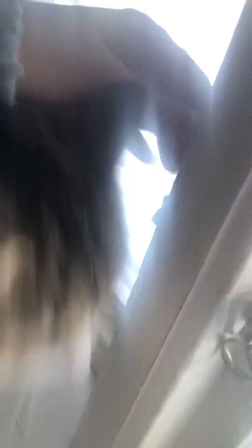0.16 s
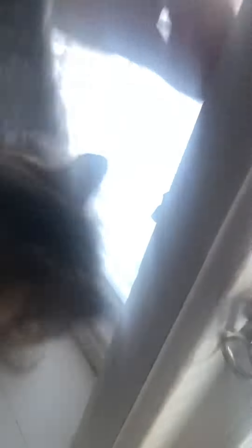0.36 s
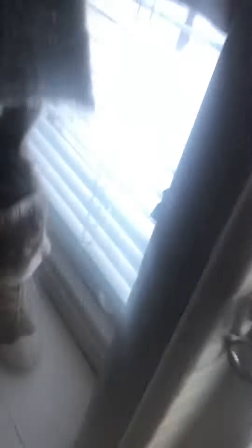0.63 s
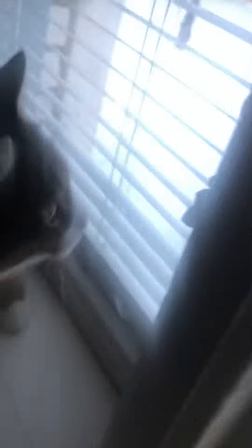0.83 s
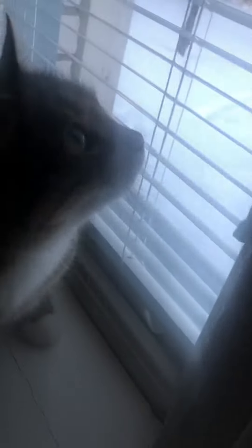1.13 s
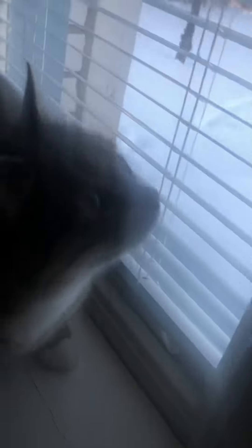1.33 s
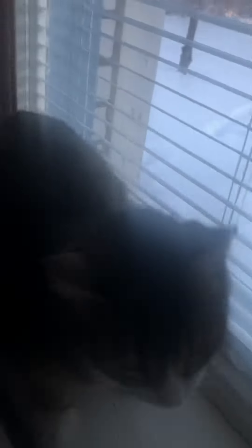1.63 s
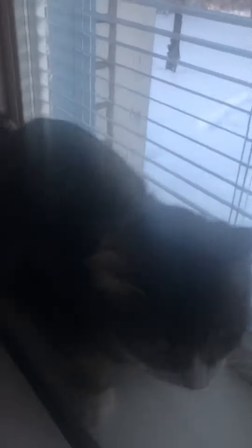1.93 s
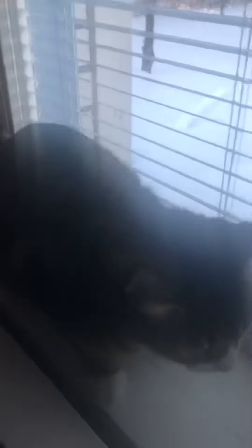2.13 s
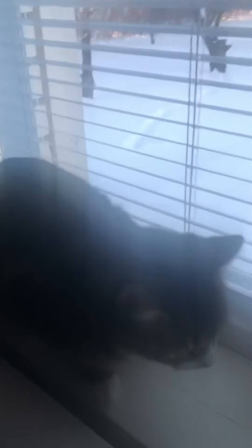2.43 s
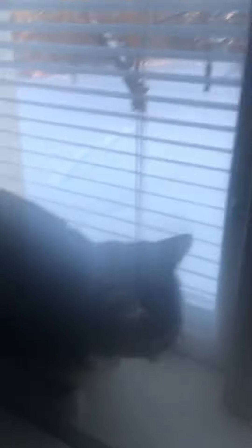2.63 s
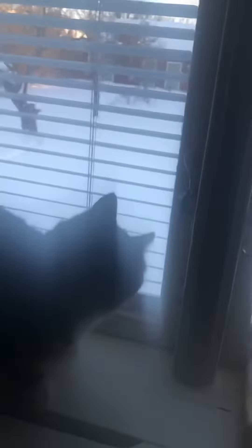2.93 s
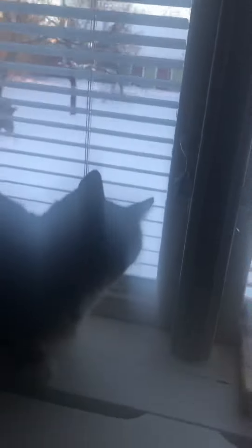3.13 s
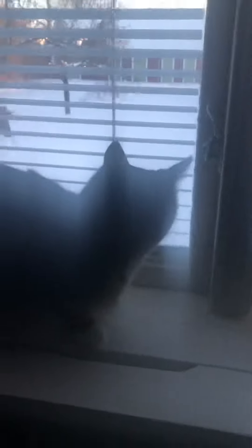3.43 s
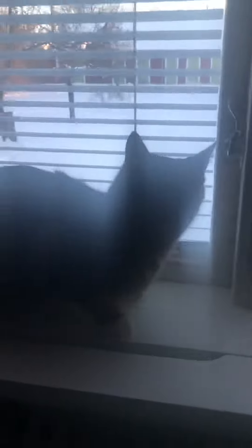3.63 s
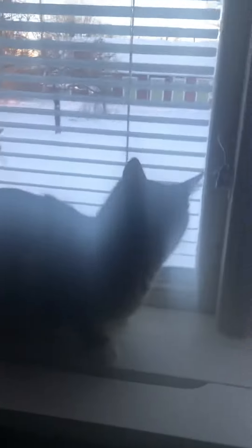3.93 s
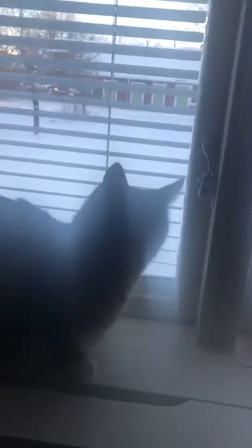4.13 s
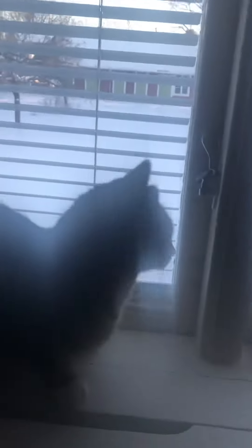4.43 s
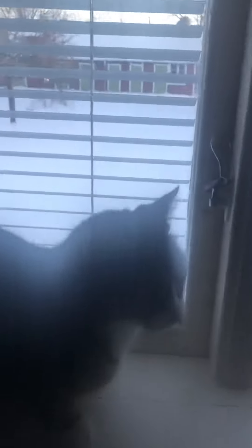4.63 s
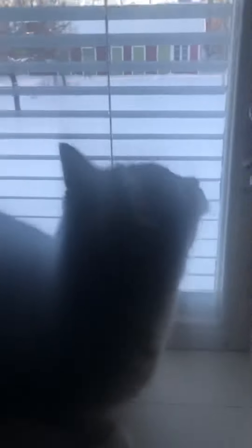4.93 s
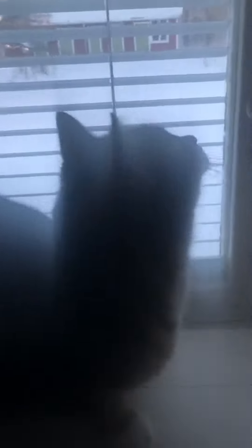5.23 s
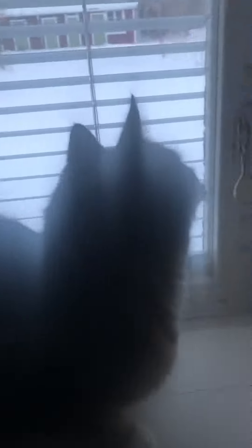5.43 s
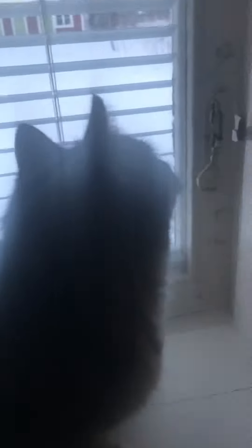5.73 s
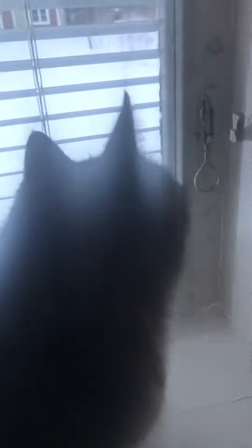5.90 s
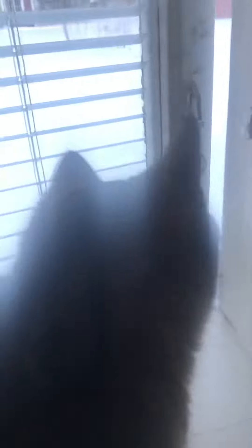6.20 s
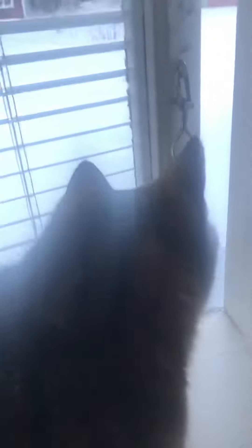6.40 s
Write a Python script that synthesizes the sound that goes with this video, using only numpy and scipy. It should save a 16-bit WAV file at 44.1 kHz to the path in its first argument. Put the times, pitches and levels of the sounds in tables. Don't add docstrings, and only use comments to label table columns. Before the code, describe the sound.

Close in a quiet room, hard latch clacks, soft paw thuds and light blind ticks lead to a sudden burst of metallic rattling and snapping.

```python
import sys
import numpy as np
from scipy import signal
from scipy.fft import rfft, irfft
from scipy.io import wavfile
from scipy.ndimage import uniform_filter1d

SR = 44100
rng = np.random.default_rng(int(sys.argv[2]) if len(sys.argv) > 2 else 0)


def to_wav(sig):
    pcm = np.clip(np.atleast_2d(sig), -1, 1) * 32767
    pcm = np.round(pcm).astype(np.int16)
    wavfile.write(sys.argv[1], SR, pcm.T)


def gain_from_db(level_db):
    decades = np.asarray(level_db, float) / 20
    return 10 ** decades


N = 289296

# frequency in Hz, level in dB per Hz.
FRAME_COLOUR = [(150, -14), (300, 1), (700, -3), (1500, -12.5), (2500, -27)]
# frequency in Hz, level in dB per Hz.
SLAT_COLOUR = [(900, -7.5), (1500, 1), (2500, 3.5), (4000, 2), (6000, -8.5), (8000, -28.5)]
# frequency in Hz, level in dB per Hz.
FINE_COLOUR = [(4500, -11.5), (6000, -1.5), (8000, -0.5), (11000, -5), (15700, -4), (16300, -32)]
# frequency in Hz, level in dB per Hz.
OPEN_TREBLE = [(4500, -10.5), (6000, 0), (8500, 1), (11000, -5), (13500, -3), (14800, -10), (16000, -12.5),
               (16800, -29)]
LATCH_HZ = [6490, 9130, 10490, 15093, 7680, 3875, 12350, 5480]


def evened(x):
    return x / np.sqrt(np.mean(x ** 2) + 1e-20)


def add(mix, s, sound):
    part = mix[round(s * SR):][:len(sound)]
    part += sound[:len(part)]


def coloured(x, spectrum):
    f, db = np.transpose(spectrum)
    hz = np.fft.rfftfreq(x.shape[-1], 1 / SR)
    gain = gain_from_db(np.interp(np.log(hz + 1), np.log(f + 1), db, left=-80, right=-80))
    return evened(irfft(rfft(x) * gain, x.shape[-1]))


def around(x, hz, octaves):
    distance = np.log2((np.fft.rfftfreq(len(x), 1 / SR) + 1) / hz) / octaves
    return evened(irfft(rfft(x) / (1 + distance ** 2), len(x)))


def swell(t, rise, t60):
    shape = (1 - np.exp(-np.maximum(t, 0) / rise)) * gain_from_db(-60 * t / max(t60, .004))
    return shape / shape.max()


def smoothed(x, size, axis=-1):
    return uniform_filter1d(uniform_filter1d(x, size, axis=axis), size, axis=axis)


def lumps(size, depth_db):
    return evened(gain_from_db(depth_db * evened(smoothed(rng.standard_normal(N), size))))


def mottled(noise, width_hz, depth_db):
    bins = noise.shape[-1] // 2 + 1
    size = max(int(width_hz * noise.shape[-1] / SR), 1)
    bumps = smoothed(rng.standard_normal((len(noise), bins)), size)
    return irfft(rfft(noise) * gain_from_db(depth_db * evened(bumps)), noise.shape[-1])


def patchy(x, depth_db):
    z = signal.stft(x, nperseg=512)[2]
    patches = uniform_filter1d(rng.standard_normal(z.shape), size=5, axis=0)
    patches = uniform_filter1d(patches, size=16, axis=1)
    return evened(signal.istft(z * gain_from_db(depth_db * evened(patches)), nperseg=512)[1][:N])


def still_air():
    # frequency in Hz, level in dB per Hz.
    air_colour = [(15, -41), (25, -17.5), (59, 4.5), (166, 0.5), (236, -15.5), (439, -19.5), (624, -12.5),
                  (1940, -17.5), (11000, -27), (14800, -26), (15900, -28.5)]
    return gain_from_db(-68 - 1.5) * coloured(rng.standard_normal(N), air_colour)


def strokes(offset_db, lean):
    # middle in seconds, length in seconds, level in dB, brightness in dB.
    handling = [(0.047, .1, -76.5, -5), (0.142, 0.12, -66.5, 10.5), (0.199, .1, -66, -41),
                (0.251, 0.07, -69, 14), (0.326, .11, -57.5, -5.5), (.385, .07, -58, 5.5),
                (0.487, 0.19, -50, -4), (0.602, 0.11, -66.5, 11), (0.727, 0.25, -66.5, 8.5),
                (4.856, .1, -64, -5), (5.04, 0.084, -55.5, -6), (5.122, .15, -50, 1),
                (5.238, 0.16, -46.5, -7), (5.353, .09, -51, 3.5), (5.413, 0.091, -48.5, 7),
                (5.483, .13, -46, -13), (5.69, 0.49, -59, -5), (5.799, .22, -72.5, 8),
                (5.989, .38, -68.5, 5)]
    # middle in seconds, length in seconds, level in dB,
    # brightness in dB.
    brushes = [(.84, 0.074, -72.5, -16), (.885, .15, -72, 0), (1.982, .12, -71.5, 8.5),
               (2.219, .36, -72, -2.5), (2.55, 0.16, -72.5, -33), (2.738, .2, -66, 0), (2.9, .16, -77, -32),
               (3.161, .2, -69.5, 7), (3.58, .15, -81, 1), (3.75, .1, -75.5, 8), (3.88, .1, -69.5, 2),
               (4.0, 0.49, -79.5, -17), (4.2, .12, -73, -9), (4.74, .22, -84, 10.5), (6.4, .25, -82, -39)]
    out = np.zeros(N)
    for s, length, db, bright_db in handling + brushes:
        arch = np.sin(np.pi * np.arange(0, length, 1 / SR) / length) ** 1.1
        add(out, max(s - length / 2, 0), gain_from_db(db + offset_db + lean * bright_db) * arch)
    return out


def stir():
    # time in seconds, level in dB.
    weight = [(0, -61), (.3, -53.5), (.52, -53.5), (.8, -63.5), (1.5, -72.5), (2.1, -67.5), (2.7, -67.5),
              (3.2, -64.5), (3.7, -65), (4.3, -74), (4.74, -70), (4.86, -56), (5.3, -47.5), (5.47, -44),
              (5.63, -53.5), (5.71, -43), (5.95, -52), (6.56, -69.5)]
    # frequency in Hz, level in dB per Hz.
    rumble_colour = [(15, -50), (25, -20.5), (42, -10), (97, -4.5), (156, 4.5), (379, -12), (425, -6.5),
                     (500, -24), (650, -55), (1100, -120)]
    rest_db = [-74, -88, -86.5]
    contacts_per_s, spread_db, busy_db = 500, 2.5, -62

    rumble = gain_from_db(np.interp(np.arange(N) / SR, *np.transpose(weight)) - 2.0)
    frame = gain_from_db(rest_db[0] - 4.5) + gain_from_db(-17) * rumble + strokes(offset_db=-4.5, lean=-0.3)
    rub = gain_from_db(rest_db[1]) + strokes(offset_db=-4.0, lean=0)
    fine = gain_from_db(rest_db[2]) + strokes(offset_db=-12.0, lean=0.89)

    strength = gain_from_db(spread_db * np.minimum(rng.exponential(1, N), 4))
    contacts = (rng.random(N) < contacts_per_s / SR) * strength
    smear = rng.standard_normal(300) * gain_from_db(-60 * np.arange(300) / SR / 0.0095)
    clicks = evened(signal.oaconvolve(contacts, smear)[:N])
    share = 0.39 * rub / (rub + gain_from_db(busy_db))
    grains = share * clicks + (1 - share) * rng.standard_normal(N)
    grains = patchy(grains * lumps(size=300, depth_db=1.5), depth_db=2.0)

    low = rng.standard_normal(N) * lumps(size=500, depth_db=2.0)
    deep = rumble * coloured(low, rumble_colour) + frame * coloured(low, FRAME_COLOUR)
    return deep + rub * coloured(grains, SLAT_COLOUR) + fine * coloured(grains, FINE_COLOUR)


def scrapes():
    # start in seconds, end in seconds, resonance in Hz, width in octaves, level in dB.
    drags = [(5.22, 5.31, 560, .6, -50.5), (5.21, 5.27, 1000, 0.18, -44.5), (5.08, 5.18, 1700, .08, -58),
             (5.665, 5.73, 900, 0.3, -55.5), (.455, .49, 3600, .08, -48), (.17, 0.206, 2900, 0.33, -66),
             (5.5, 5.62, 420, 0.58, -56), (5.668, 5.77, 590, 0.42, -60), (.815, .865, 740, .4, -66),
             (6.35, 6.46, 690, .5, -70.5), (.675, .725, 6000, 0.03, -75), (.67, .74, 3200, 0.03, -76),
             (.67, 0.83, 5200, .8, -66.5), (.79, .825, 7350, .03, -74), (.29, .33, 5500, .04, -63),
             (0, .14, 1750, 0.16, -71), (0.272, 0.48, 3900, .05, -67), (0.419, 0.515, 3950, .06, -54),
             (.5, .555, 3000, .8, -64.5), (.415, .48, 13500, .2, -64), (2.495, 2.6, 1330, 0.1, -71),
             (2.66, 2.948, 1370, 0.071, -83), (2.2, 2.82, 2000, 0.96, -77), (5.7, 5.96, 220, 0.3, -54),
             (5.32, 5.43, 500, .6, -55.5), (.235, .27, 14000, .15, -71), (5.44, 5.5, 6900, 0.66, -42),
             (2.84, 2.97, 530, 0.17, -67), (4.64, 4.9, 3900, 0.038, -83), (4.65, 4.84, 14700, .15, -78),
             (5.132, 5.18, 4080, 0.022, -47), (5.068, 5.13, 3900, 0.062, -52),
             (5.32, 5.4, 3950, .06, -59.5), (5.44, 5.52, 3950, .08, -52), (5.75, 5.872, 2000, 0.2, -66.5),
             (5.7, 6.17, 4440, 0.069, -75), (5.9, 6.1, 13000, .15, -77)]
    out, noise = np.zeros(N), rng.standard_normal(N) * lumps(size=250, depth_db=1.5)
    for start, stop, hz, octaves, db in drags:
        part = around(noise[int(start * SR):int(stop * SR)], hz, octaves)
        add(out, start, gain_from_db(db) * part * signal.windows.tukey(len(part), .5))
    return out


def thuds():
    # start in seconds, level in dB, pitch in Hz, time to die by 60 dB in seconds.
    pushes = [(.01, -49, 60.7, 0.072), (.29, -57, 70, 0.11), (0.619, -51, 60, 0.13),
              (0.177, -43.5, 335, 0.081), (.295, -43, 297, 0.13), (3.08, -49, 65, .1),
              (3.15, -50.5, 65, 0.14), (3.22, -47.5, 60, 0.099), (3.312, -50.5, 59.6, 0.08),
              (5.23, -42.5, 70, 0.14), (5.901, -44, 60.4, 0.17), (6.37, -52.5, 301, .1),
              (0.42, -36.5, 232.6, 0.29), (.51, -43, 223, 0.32), (0.815, -48.5, 471, 0.13),
              (1.006, -48, 95, 0.11), (1.325, -53, 144.7, 0.05), (1.356, -46.5, 86, 0.13),
              (1.632, -51, 99, 0.11), (1.97, -54.5, 192, 0.04), (2.083, -49, 137, 0.049),
              (2.117, -51, 193, 0.048), (2.526, -44.5, 160, 0.035), (3.142, -39, 277, 0.032),
              (3.205, -32, 150, 0.021), (3.299, -43.5, 383, 0.065), (3.361, -54, 80, 0.087),
              (3.615, -54.5, 262, 0.061), (4.696, -53, 159, 0.057), (4.828, -45.5, 212, 0.11),
              (4.961, -49.5, 158.5, 0.069), (5.213, -30, 648.7, 0.053), (5.438, -31, 1044, 0.037),
              (5.446, -23.5, 320, 0.017), (5.667, -46, 355, 0.091), (6.211, -50.5, 267, 0.18),
              (6.288, -55, 256, 0.19), (6.521, -51.5, 208, 0.16)]
    out, t = np.zeros(N), np.arange(6000) / SR
    for s, db, hz, t60 in pushes:
        turn = 2 * np.pi * np.cumsum(hz * (.9 + 2.4 * np.exp(-t / 0.0026))) / SR
        wave = np.sin(turn) + 0.36 * np.sin(.42 * turn)
        add(out, s, gain_from_db(db - 2.5) * wave * swell(t, 0.0016, t60))
    return out


def hits(rows, treble, t60, tone, tail_db, snap):
    out, t = np.zeros(N), np.arange(6000) / SR
    noise = mottled(rng.standard_normal((len(rows), 6000)), width_hz=180, depth_db=2.5)
    middle, bright = coloured(noise, SLAT_COLOUR), coloured(noise, treble)
    dull = coloured(noise, FRAME_COLOUR)
    tail = gain_from_db(tail_db) * swell(t, 0.0014, 0.27)
    first = 1 + snap * np.exp(-t / 0.00036)
    for k, (s, db, bright_db, dull_db, hz) in enumerate(rows):
        note = np.sqrt(2) * np.sin(2 * np.pi * hz * t) * gain_from_db(-40 * t / t60)
        crack = around(middle[k], hz, 2.1)
        sound = ((1 - tone) * crack * first + tone * note) * swell(t, 0.00019, t60) + crack * tail
        bright_shape = swell(t, 0.00017, 0.76 * t60) + .5 * tail + first - 1
        sound += gain_from_db(bright_db) * bright[k] * bright_shape
        sound += gain_from_db(dull_db) * dull[k] * swell(t, 0.0014, 2.6 * t60)
        add(out, s, gain_from_db(db - 8) * sound)
    return out


def taps():
    # start in seconds, level in dB, treble in dB, frame in dB, resonance in Hz.
    contacts = [(.1655, -33.5, -22, -33, 2240), (.2907, -46, -8, -30, 7680), (.3122, -44, -14.5, -30, 3253),
                (.4112, -16.5, 0, -30, 12350), (.4648, -46, -10, -29, 12330), (.475, -29.5, -20, -32, 5000),
                (.4835, -33, -20, -30, 3200), (.5195, -31, -23, -30, 4970), (.6185, -48, -9, -20, 6000),
                (.8715, -54, -9, -21.5, 7300), (.9245, -57, -9, -17, 7310), (5.0217, -29.5, 0, -26, 6800),
                (5.0738, -23, -6, -29, 12350), (5.078, -21, -3, -30, 12350),
                (5.0975, -25.5, -3.5, -34, 12500), (5.1115, -39.5, -3, -30, 12350),
                (5.1255, -31, -2, -30, 7600), (5.1325, -31, -4, -30, 3880), (5.1598, -27, -8.5, -30, 7600),
                (5.189, -20, 2.5, -31, 12350), (5.195, -23, -2, -33, 7450), (5.2232, -29.5, -3, -30, 7500),
                (5.3158, -21.5, 1, -33, 12350), (5.3285, -38.5, -2.5, -22, 7590),
                (5.3555, -44, -3.5, -30, 7600), (5.4265, -27.5, 0, -30.5, 7600),
                (5.4356, -2.5, -12, -32.5, 5500), (5.4357, -9.5, -30.5, -31, 2400),
                (5.4398, -11.5, -8.5, -30, 12770), (5.4416, -17, -6, -28.5, 8500),
                (5.448, -24, 0, -30.5, 7590), (5.4528, -20, -6.5, -30, 13200),
                (5.4597, -22.5, -3.5, -30.5, 6000), (5.4718, -24.5, 0, -30.5, 7660),
                (5.4838, -27, -7.5, -31, 4000), (5.633, -52, -8, -30, 7800), (5.676, -40, -7, -30, 6530),
                (5.0186, -29, -20, -30, 3430)]
    return hits(contacts, OPEN_TREBLE, t60=0.012, tone=0.7, tail_db=-30.5, snap=0.4)


def clacks():
    # start in seconds, level in dB, treble in dB, frame in dB, slat resonance in Hz.
    blows = [(.1695, -35.5, -13, -35, 3300), (.171, -44, -28, 0.5, 3080), (.2674, -35.5, -14, -19.5, 3300),
             (.2755, -26, -26, -12.5, 3450), (.2897, -34, -27, -4, 2200), (.3046, -35, -30.5, -6, 3180),
             (.3174, -47, -10.5, -3, 3970), (.398, -31.5, -14, -14, 3390), (.411, -6.5, -18.5, -20.5, 3757),
             (.415, -12.5, -24, -18, 1774), (.4455, -12.5, -20, -20, 4050), (.4604, -24, -16, -19.5, 3920),
             (.4735, -23.5, -30.5, -23, 4060), (.5049, -34, -32, -28, 4170), (.519, -30, -34, -33, 3005),
             (5.6252, -39, -13.5, -8, 2947), (5.637, -41, -1, -30, 990), (5.665, -33.5, -27, 3.5, 1270),
             (5.6695, -42, -0.5, 6.5, 1010)]
    # frequency in Hz, level in dB per Hz.
    muffled_treble = [(4500, -11.5), (6000, -6.5), (8500, -4), (10000, -14), (12000, -22), (15500, -24),
                      (16800, -34)]
    return hits(blows, muffled_treble, t60=0.044, tone=0.5, tail_db=-26.5, snap=0.68)


def chatter(blows):
    note_db = [-7, -8, -3, -3, -8, -6, -6, -13]
    t = np.arange(6000) / SR
    notes = sum(gain_from_db(db) * np.sin(2 * np.pi * hz * t) for hz, db in zip(LATCH_HZ, note_db))
    return signal.oaconvolve(blows, gain_from_db(-37 - 60 * t / .09) * notes)[:N]


def latch():
    # struck in seconds, damped in seconds, level in dB,
    # time to die by 60 dB once damped in seconds.
    rings_of_notes = [
        [(.37, 0.47, -73, .03), (5.215, 5.23, -58, .05), (.411, 0.518, -39.5, .05),
         (5.073, 5.097, -41.5, 0.018), (5.1, 5.185, -59, .03), (5.317, 5.325, -43.5, 0.17),
         (5.672, 5.68, -67, .15)],
        [(.42, .441, -49, 0.032), (.445, .483, -48.5, 0.027), (.275, .29, -76, .1), (5.215, 5.25, -58, .06),
         (5.33, 5.391, -58, 0.029), (5.49, 5.62, -57.5, 0.65)],
        [(.278, .39, -75, .035), (.415, .418, -52, 0.04), (.44, .525, -67, .04), (5.08, 5.16, -47, 0.031),
         (5.16, 5.202, -39.5, 0.078), (5.331, 5.34, -54, 0.34), (5.429, 5.46, -40, 0.049),
         (5.495, 5.52, -49.5, 0.33)],
        [(.275, .39, -70, 0.058), (.402, .45, -55.5, .33), (5.078, 5.185, -45.5, 0.035),
         (5.192, 5.222, -32, 0.24), (5.32, 5.39, -50, 0.05), (5.4, 5.43, -56.5, .03), (5.44, 5.52, -49.5, .3),
         (5.57, 5.69, -61, .3)],
        [(.29, 0.3, -67, .03), (0.314, 0.322, -59, .02), (0.427, 0.4, -58, .03), (.447, 0.467, -52, 0.14),
         (5.37, 5.375, -51.5, .04), (5.1, 5.15, -62, .03), (5.215, 5.25, -63, .05), (5.46, 5.49, -44.5, 0.058),
         (5.16, 5.162, -34.5, 0.024)],
        [(.412, 0.455, -44, 0.15), (5.095, 5.135, -53, .03), (5.143, 5.15, -50, 0.033),
         (5.32, 5.38, -59.5, 0.045), (5.485, 5.51, -62, 0.11)],
        [(.399, .42, -64, .03), (.462, .48, -67.5, .06), (5.066, 5.07, -38, 0.03), (5.078, 5.082, -33, .04),
         (5.097, 5.1, -35, .04), (5.111, 5.114, -46, 0.045), (5.466, 5.475, -41, .027)],
        [(5.1, 5.135, -66, 0.036), (5.215, 5.25, -54, .05), (5.32, 5.36, -63.5, .08), (5.44, 5.45, -51, .06)],
    ]
    twin_gap_hz = [1.47, 13, 4.2, 9.5, 22, 170, 35, 30]
    out = np.zeros(N)
    for hz, gap_hz, rings in zip(LATCH_HZ, twin_gap_hz, rings_of_notes):
        for start, stop, db, t60 in rings:
            t = np.arange(int((stop - start + t60) * SR)) / SR
            level_db = db - 60 * np.maximum(t - (stop - start), 0) / t60
            pair = np.sin(2 * np.pi * hz * t) + 0.34 * np.sin(2 * np.pi * (hz + gap_hz) * t)
            add(out, start, np.sqrt(2) * gain_from_db(level_db) * (1 - np.exp(-t / 0.001)) * pair)
    return out


def ticks():
    # start in seconds, level in dB, treble in dB, frame in dB, slat resonance in Hz.
    touches = [(.8129, -50.5, -24, 8, 1605), (.9038, -55.5, -10, -11.5, 1010), (.9363, -48, -16, -5, 2300),
               (1.9663, -54, -12, -5, 1744), (1.9754, -50.5, -11.5, -8, 3940),
               (2.0002, -45.5, -10.5, -11, 5910), (2.5284, -64, -14, 16, 1277), (2.929, -64, 3, -2.5, 1170),
               (3.0699, -52.5, -20, -6, 1041), (3.0949, -47.5, -9, -12.5, 1290),
               (3.1375, -40.5, -12, -7.5, 2900), (3.1948, -38.5, -19, -11.5, 1810),
               (3.293, -42.5, -10, -12.5, 4360), (3.3004, -59, -30, 12, 1440),
               (3.4273, -51, -8, -2.5, 1370), (3.5703, -49.5, -10, -2.5, 1440), (3.58, -57, -14.5, 2, 1428),
               (3.7379, -59.5, -11, 5, 1422), (4.5471, -47, -6, -14, 3490),
               (4.96, -50.5, -9.5, -14.5, 2996)]
    return hits(touches, FINE_COLOUR, t60=0.017, tone=0.58, tail_db=-24.5, snap=1.4)


def rattle():
    # start in seconds, level in dB, treble in dB, frame in dB, slat resonance in Hz.
    knocks = [(5.0184, -30, -16, -34, 3540), (5.03, -32, 1.5, -19, 1930), (5.066, -22, -6, -33, 3120),
              (5.0713, -18, -5.5, -18.5, 2080), (5.0774, -24.5, -8.5, -23, 2470),
              (5.0884, -21, -14, -8.5, 2260), (5.0955, -32.5, 4.5, -24, 4000),
              (5.1122, -27, -11, -15.5, 3580), (5.1377, -23.5, -6.5, -29, 3730),
              (5.1587, -25, 1.5, -15, 4070), (5.1882, -14, -5, -22, 1120),
              (5.1976, -32.5, -10.5, 7.5, 1510), (5.2145, -16.5, -7.5, -9.5, 1130),
              (5.2247, -34, -3, 6, 1070), (5.2441, -35.5, 5.5, 5.5, 1030), (5.2689, -42, -5, 5, 1110)]
    return hits(knocks, OPEN_TREBLE, t60=0.055, tone=0.47, tail_db=-32.0, snap=0.75)


def squeak():
    # time in seconds, pitch in Hz, level in dB.
    glide = [
        (5.284, 4220, -53),
        (5.292, 4270, -49),
        (5.298, 4300, -46),
        (5.303, 4350, -55.5),
        (5.314, 4437, -55),
    ]
    harmonic_db = [6, -4, -4]
    s, hz, db = np.transpose(glide)
    t = np.arange(s[0], s[-1], 1 / SR)
    waver = 1 + .075 * evened(uniform_filter1d(rng.standard_normal(len(t)), size=24))
    turn = 2 * np.pi * np.cumsum(np.interp(t, s, hz) * waver) / SR
    stack = sum(gain_from_db(g) * np.sin((k + 1) * turn) for k, g in enumerate(harmonic_db))
    out = np.zeros(N)
    add(out, s[0], gain_from_db(np.interp(t, s, db)) * stack)
    return out


def snaps():
    # start in seconds, level in dB, treble in dB, frame in dB, slat resonance in Hz.
    bounces = [(5.3153, -17.5, 1.5, -8, 6040), (5.3335, -37, -5, 6, 1080), (5.3541, -41, -6, 0.5, 1089),
               (5.3692, -33, -2.5, -14, 7300), (5.3949, -26, -8, -26.5, 5470), (5.398, -18.5, 0, -16, 6300),
               (5.4234, -23.5, -7, -16.5, 5800), (5.4378, -12, -3.5, -15.5, 6210),
               (5.4395, -15.5, 5.5, -13, 1150), (5.4524, -16.5, 0, -15.5, 5600),
               (5.4654, -21.5, -1.5, -6.5, 3860), (5.4733, -19.5, -4, -12.5, 4200),
               (5.4814, -23, 4.5, -7.5, 6100), (5.4944, -33, 0.5, -3, 3880)]
    return hits(bounces, OPEN_TREBLE, t60=0.036, tone=0.59, tail_db=-30.0, snap=0.84)


def scene():
    metal = taps() + clacks() + rattle() + snaps()
    latch_sound = metal + chatter(metal) + latch() + squeak()
    soft = stir() + scrapes() + thuds() + ticks()
    return (still_air() + soft + latch_sound)[None]


def band_limit(x):
    return signal.sosfilt(signal.butter(12, 16810, fs=SR, output="sos"), x)


def record(dry):
    low_pass = signal.firwin(101, 16600, fs=SR)[None]
    mix = signal.oaconvolve(dry, low_pass, "same")
    return band_limit(mix)


dry = scene()
out = record(dry)
to_wav(out)
```